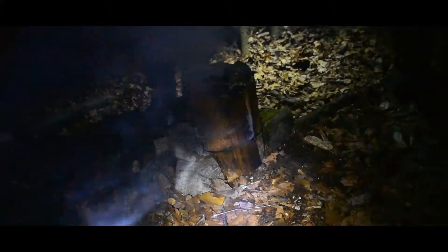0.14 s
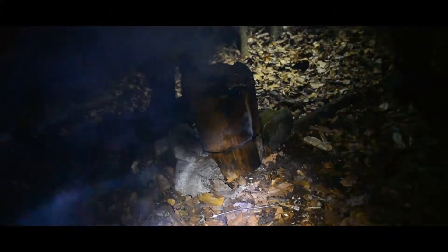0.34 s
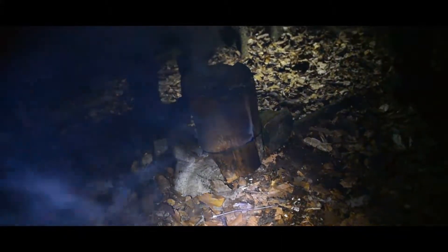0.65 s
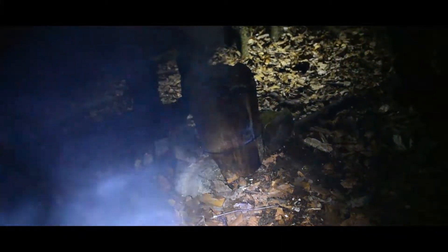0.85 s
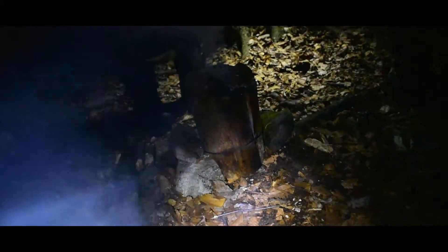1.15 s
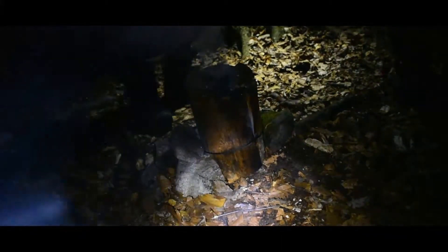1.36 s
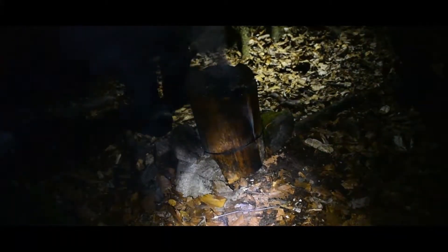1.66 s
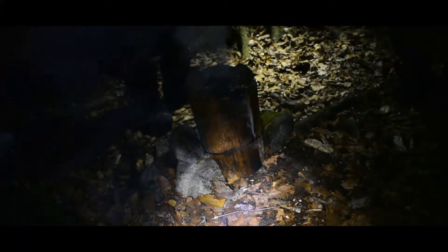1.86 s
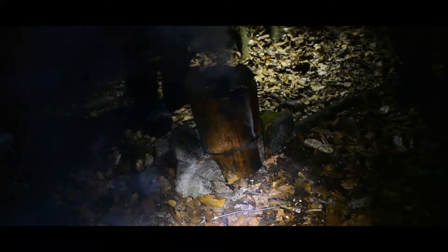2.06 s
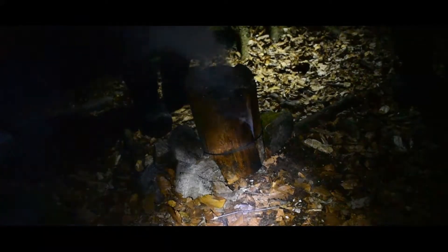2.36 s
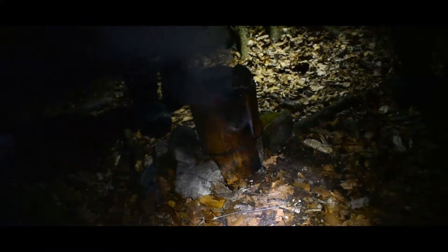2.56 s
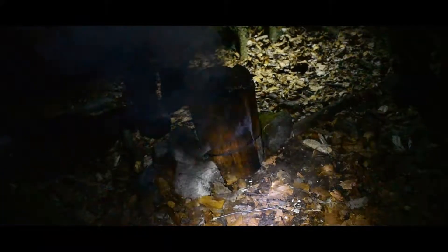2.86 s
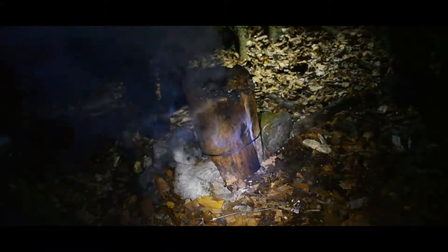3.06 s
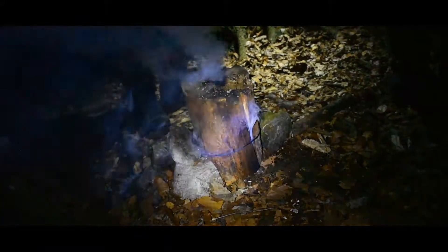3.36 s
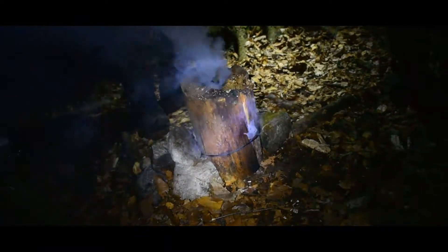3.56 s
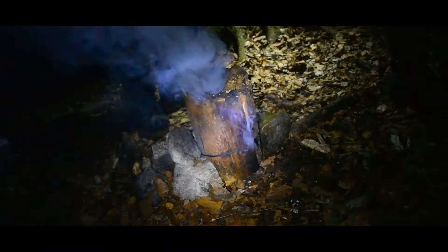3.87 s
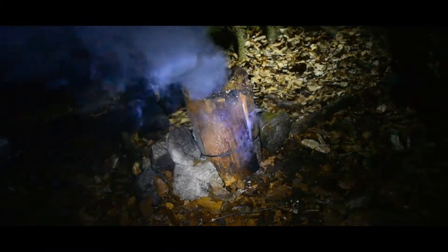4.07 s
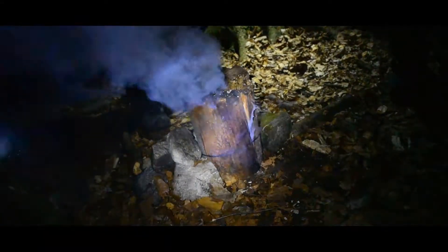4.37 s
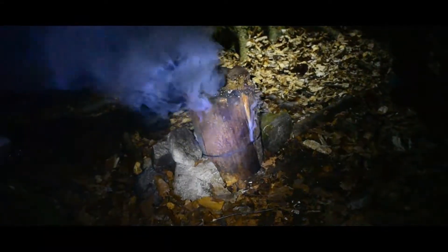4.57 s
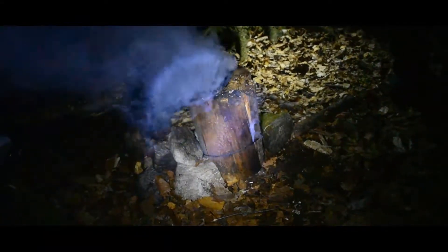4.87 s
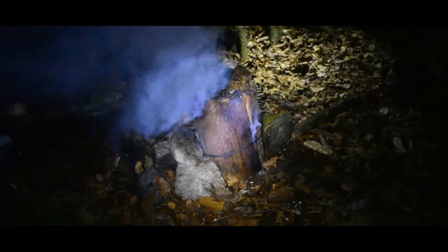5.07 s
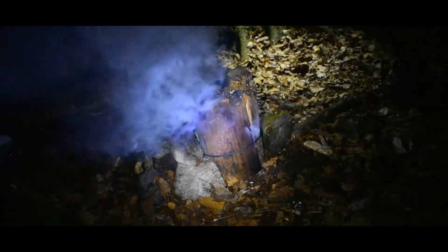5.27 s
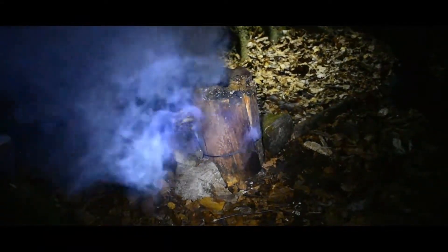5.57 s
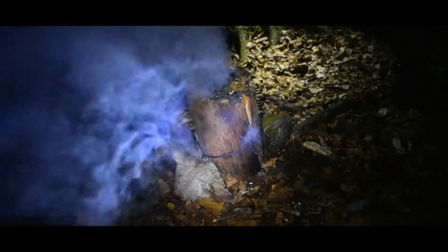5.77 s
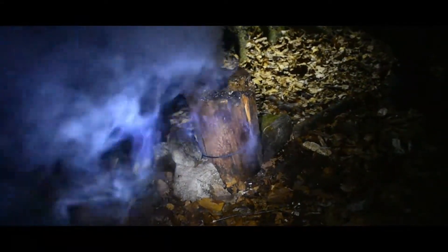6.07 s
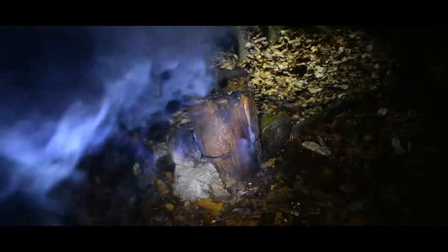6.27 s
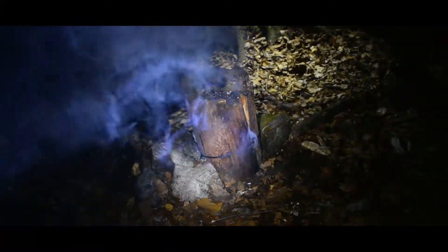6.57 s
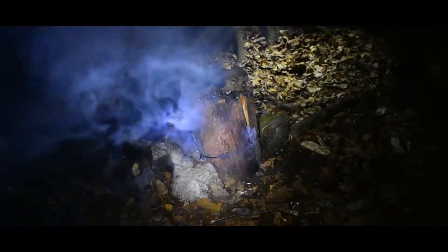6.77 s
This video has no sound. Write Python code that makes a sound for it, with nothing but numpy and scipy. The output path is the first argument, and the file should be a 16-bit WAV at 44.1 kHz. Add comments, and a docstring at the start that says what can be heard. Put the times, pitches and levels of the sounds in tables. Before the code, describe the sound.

Dry, sharp pops and clustered crackles from a wet burning log, with short steam spurts and tiny ember ticks above a hushed night hiss.

```python
"""On a forest floor at night, a damp log burns. Pockets of steam burst in the wood as pops and crackles:
short bursts of noise with a thud, a ring and treble. Some steam vents on as short spurts, one with a whistle.
Embers tick as tiny ringing clicks. A grainy rustling sizzle, made of tiny random clicks, swells and sinks.
Below lie faint bands of hiss, the low flutter of the flames and the night's hiss, all made of shaped noise."""
import sys
import numpy as np
from scipy import signal
from scipy.fft import rfft, irfft, next_fast_len
from scipy.io import wavfile

SR = 44100
rng = np.random.default_rng(int(sys.argv[2]) if len(sys.argv) > 2 else 0)


def output_pcm(signal):
    """Save a mono or channel-first signal as 16-bit PCM at the path in sys.argv[1].

    Samples are clipped to [-1, 1] before scaling.
    """
    pcm = np.clip(np.atleast_2d(signal).T, -1, 1) * 32767
    wavfile.write(sys.argv[1], SR, np.round(pcm).astype(np.int16))


N = 305337


def from_db(db):
    """Turn decibels into a gain."""
    return 10 ** (np.asarray(db) / 20)


def rms_one(x):
    """Scale a sound to an average (rms) level of 1."""
    return x / np.sqrt(np.mean(x ** 2) + 1e-20)


def at_hz(points, hz):
    """Read a curve between its points, on a log-frequency axis."""
    point_hz, values = np.array(points).T
    return np.interp(np.log(hz), np.log(point_hz), values)


def drift(corner_hz):
    """Random wandering of rms 1, smoothed by two equal low-pass poles and computed every 40 samples."""
    step, warm_up = 40, 2000
    r = np.exp(-2 * np.pi * corner_hz * step / SR)
    noise = rng.standard_normal(N // step + 2 + warm_up)
    slow = signal.lfilter([1], [1, -2 * r, r * r], noise)[warm_up:]
    return np.interp(np.arange(N) / step, np.arange(len(slow)), rms_one(slow))


def resonance(x, hz, wide_hz):
    """Two-pole resonance: passes a band around one pitch, with a gain near 1 at its top."""
    r = np.exp(-np.pi * wide_hz / SR)
    poles = [1, -2 * r * np.cos(2 * np.pi * hz / SR), r * r]
    return signal.lfilter([(1 - r * r) / 2, 0, (r * r - 1) / 2], poles, x)


def add_bands(x, rows):
    """Lift some bands of a sound, or lower them where the dB is negative."""
    return x + sum((from_db(db) - 1) * resonance(x, hz, wide_hz) for hz, wide_hz, db in rows)


# Left-right balance of the noise. Each row: pitch in Hz, left above right in dB.
LEFT_RIGHT_BALANCE = [(60, -0.5), (180, -0.5), (550, -1), (1650, -0.5), (4970, -1.5), (15000, -1.5)]


def coloured(mid, side, spectrum, likeness):
    """Shape two noises in pitch and mix them into left and right, more or less alike; rms 1."""
    size = next_fast_len(N)
    hz = np.maximum(np.fft.rfftfreq(size, 1 / SR), 1)
    alike = np.clip(at_hz(likeness, hz), 0, 1)
    m = rfft(mid, size) * np.sqrt(1 + alike)
    s = rfft(side, size) * np.sqrt(1 - alike)
    balance_db = np.outer([.5, -.5], at_hz(LEFT_RIGHT_BALANCE, hz))
    shape = from_db(balance_db + at_hz(spectrum, hz))
    return rms_one(irfft(np.array([m + s, m - s]) * shape, size)[:, :N])


def grains(per_s, spread_db, flicker_db):
    """Tiny clicks at random moments; a few are larger, and their level flickers in clumps."""
    sizes = from_db(spread_db * np.minimum(rng.exponential(1, N), 5) + flicker_db * drift(32.0))
    return rms_one(sizes * rng.standard_normal(N) * (rng.random(N) < per_s / SR))


# Steam pockets bursting. Each row: start in seconds, thud level in dB, ring pitch in Hz, ring level in dB,
# treble level in dB, fall time of the crack in ms, scatter level in dB, left above right in dB.
STEAM_POPS = [(.409, -41.5, 2050, -41, -43, 2.7, -12, -2), (.4156, -63, 2870, -32, -30, 1.5, -8, -1.5),
              (1.0421, -33.5, 4760, -20, -6, 0.81, -6, -2), (1.0647, -69, 4040, -53, -30, .35, 0, -2),
              (1.0717, -65, 4720, -39, -26.5, 0.79, -3, -2), (1.0888, -59, 4670, -48, -34, 0.64, -6, 2),
              (1.279, -66, 5480, -52, -33.5, 0.3, -9, -4), (1.3004, -70, 3410, -63, -34.5, .41, -13, -2),
              (1.39, -56, 1880, -55, -67, 3, -8, -.5), (2.022, -52, 1830, -48, -45, 1.5, -15, -2),
              (2.163, -59, 1700, -50.5, -54, 2.4, -7, -.5), (2.3448, -47.5, 1630, -50, -61, 1.4, -2, -2),
              (2.3705, -44, 3790, -38, -29, 1.65, -6, -1), (2.3802, -58, 2750, -30, -24, 1.5, -5, 0),
              (2.3884, -55, 2770, -30.5, -19, 0.31, -11, -1), (2.4043, -48, 2680, -35, -29, 0.61, -1, -1),
              (2.417, -41.5, 2740, -25.5, -37, 1.21, -6, -1),
              (2.421, -40.5, 2800, -25.5, -22.5, 2.46, 2, -2), (2.4472, -43, 1870, -36.5, -36, 1.2, -3, -2),
              (2.471, -54, 2230, -54, -49, 1.6, -4, -1), (2.5033, -68, 2680, -43, -34.5, 1.9, -6, -1),
              (2.548, -55, 1400, -49, -60, 1.4, -2, 2), (2.6517, -48, 2260, -34, -34, 1.06, 1.5, -1.5),
              (2.7518, -40, 2680, -30, -30, 0.83, -10, 0), (2.7665, -39, 3750, -20, -6, 0.61, -11, -5.5),
              (2.773, -54, 3540, -41, -21.5, 1.2, -3, 2), (2.7757, -51, 5850, -44, -28, 0.42, -2, -1),
              (2.7807, -71, 5320, -48, -25, .96, -13, -2), (2.7888, -75, 5070, -48, -28, .47, -5, -7),
              (3.106, -56, 1970, -48.5, -47, 0.55, -13, -2), (3.1302, -51, 3100, -57, -39, 0.76, -9, -1),
              (3.355, -54, 3280, -54, -37.5, .35, -13, -1), (3.5002, -49, 3320, -44, -56, 0.93, -5, 0),
              (3.52, -70, 3820, -41.5, -41, 1.5, -11, 0), (3.6184, -53, 2210, -40.5, -33.5, 1.1, -4, -1),
              (4.1346, -70, 2860, -49.5, -48, 1.8, 0, -1.5), (4.7715, -62, 4100, -47, -51, .8, -10, -3.5),
              (4.8597, -64, 4540, -40, -49, .8, -8, -1), (4.8982, -64, 3180, -41.5, -59, 0.77, -21, -2.5),
              (4.9879, -44, 4260, -20.5, -53, 1.54, -24, -7), (5.1912, -32.5, 5300, -11, -6, .28, -12, 5),
              (5.1973, -60, 3930, -29, -27, 0.79, -26, -7), (5.2363, -64, 5100, -32, -21, 0.37, -15, -0.5),
              (5.284, -53, 5700, -29, -12.5, 0.3, -9, 0), (5.2874, -52, 5440, -25.5, -17, 1.34, -22, -1),
              (5.684, -51, 2300, -42.5, -23, 0.14, -7.5, -2), (5.784, -56, 2850, -46, -60, 1.7, -14, -1),
              (5.817, -69, 3180, -36, -33, 1.1, -9, -0.5), (6.035, -72, 4830, -37.5, -52, 0.5, -11, -1),
              (6.351, -52, 2250, -43, -39, 2.1, -14, 0), (6.3653, -48.5, 2080, -41, -32, 3.17, -16, -1),
              (6.4408, -69, 4330, -43, -48, 1.2, -11, 0), (6.4664, -58, 5870, -29.5, -52, 0.18, -13, -1.5),
              (6.4883, -67, 5990, -35, -52, 0.55, -11, 3), (6.4942, -59, 4680, -35, -34, .38, -25, -3),
              (6.5454, -65, 1700, -43, -46, 1.2, -5, 1), (6.583, -68, 2930, -42.5, -43, 1.3, 0, 0),
              (6.5943, -60, 3930, -31.5, -27.5, 2.5, -19, 0),
              (6.5961, -53.5, 3770, -41, -23.5, 0.28, -14, -3),
              (6.6141, -61, 5010, -28.5, -38, 0.34, -3, 0), (6.6413, -63, 4100, -28, -24, 0.73, -8.5, -1.5),
              (6.7098, -63, 4020, -30, -64, 1.7, -8.5, -1), (6.735, -61, 3150, -47.5, -64, 1.9, -1, -2),
              (6.833, -50, 4000, -30.5, -36, 1.6, -5, 1), (6.8512, -60, 3870, -33, -41, .68, -13, -2),
              (6.8592, -51, 2960, -42, -33, 1.9, -6, -3), (6.8644, -66, 1630, -35, -32, 1.35, -9, 1),
              (6.873, -67, 4080, -31.5, -38, 0.99, -1, -1), (6.8964, -66, 4210, -43, -55, 1.3, -6, -1)]
TREBLE_HZ, TREBLE_HZ_PER_MS = 10630, -600   # slower cracks sound a little duller


def pops(onset_s=.0005, onset_db=-30, scatter_t60=0.025, side_db=-11, ring_q=1.25, treble_q=1.9, thud_hz=1200):
    """A very short faint onset, a sharp crack, then sound scattered by logs and ground; all feed three bands."""
    size, lead = SR // 10, round(onset_s * SR)
    first = slice(0, lead + SR // 400)   # levels are set over the onset and the first 2.5 ms
    t = (np.arange(size) - lead) / SR
    out = np.zeros((2, N + size))
    noise = rng.standard_normal((len(STEAM_POPS), 3, size))
    for row, (mid, side, rattle) in zip(STEAM_POPS, noise):
        s, thud_db, hz, ring_db, treble_db, crack_ms, scatter_db, pan_db = row
        treble_hz = TREBLE_HZ + TREBLE_HZ_PER_MS * crack_ms

        fall = np.exp(-1000 * t / max(crack_ms, .05))
        opening = np.clip(t / (crack_ms ** 2 / 4000) + 0.069, .1, 1)   # slow bursts open gradually
        crack = np.where(t < 0, from_db(onset_db), fall * opening)
        crack = crack / np.sqrt(np.mean((mid * crack)[first] ** 2))

        # the scatter is loudest 4 ms after the crack
        scatter = from_db(scatter_db - 60 * np.abs(t - .004) / scatter_t60) * np.clip(t / 0.0012, 0, 1)
        width = side * (from_db(side_db) * crack + 0.17 * scatter)
        burst = mid * crack + rattle * scatter + np.outer([1, -1], width)

        push = burst + np.abs(mid) * crack * (t >= 0)   # the escaping gas pushes one way
        deepest_hz = np.interp(thud_db, [-38, -33], [380, 110])   # only the biggest bursts reach the bass
        thud = signal.sosfilt(signal.butter(2, [deepest_hz, thud_hz], "band", fs=SR, output="sos"), push)
        wide_hz = hz / ring_q * hz / 3000   # deep rings are the purer ones
        ring = resonance(resonance(burst, hz, wide_hz), hz, 2 * wide_hz)
        treble = resonance(resonance(burst, treble_hz, treble_hz / treble_q), treble_hz, treble_hz)

        sound = np.zeros((2, size))
        for part, db in [(thud, thud_db), (ring, ring_db), (treble, treble_db)]:
            sound += from_db(db) * part / np.sqrt(np.mean(part[:, first] ** 2))
        at = round(s * SR) - lead
        out[:, at:at + size] += from_db([[pan_db / 2], [-pan_db / 2]]) * sound
    return out[:, :N]


# Steam venting from a crack. Each row: loudest moment in seconds, rise in ms, fall in ms, rush level in dB,
# rush pitch in Hz, hiss level in dB.
STEAM_SPURTS = [(.15, 58, 82, -59, 2520, -43.5), (0.411, 20, 25, -50, 1300, -37.5),
                (.64, 63, 58, -56, 2500, -45.5), (1.078, 16, 30, -58, 3000, -40),
                (2.379, 16, 85, -34.5, 2700, -37), (2.423, 25, 16, -38, 2600, -39),
                (2.447, 20, 23, -39, 1900, -33), (2.472, 5.4, 17, -39.5, 2200, -52),
                (2.59, 16, 28, -48, 2100, -58), (2.643, 17, 18, -39, 1280, -40.5),
                (2.772, 5.6, 105, -58, 3000, -34), (4.99, 4.1, 84, -34.5, 3000, -60),
                (5.705, 8, 50, -45, 500, -65), (6.364, 21.4, 27.4, -39, 1770, -28),
                (6.598, 25, 50, -47, 3500, -41), (6.866, 19, 26, -43, 1570, -45)]
# Colour of the bright hiss, also used in the sizzle. Each row: pitch in Hz, relative level in dB per Hz.
HISS_COLOUR = [(3000, -19.5), (5000, -5), (7000, -4), (9500, -0.5), (11500, -3), (13500, -12.5),
               (15500, -7)]


def spurts(swell_db=22, rush_q=1.0, alike=0.94):
    """Sputtering steam swells and dies; its rush sits on the pitch of its crack."""
    mid, side = (grains(per_s=20000, spread_db=2.5, flicker_db=0.5) for _ in range(2))
    likeness = [(100, alike), (10000, alike)]
    flat = coloured(mid, side, [(100, 0), (10000, 0)], likeness)
    hiss = coloured(mid, side, HISS_COLOUR, likeness)
    out = np.zeros((2, N))
    for s, rise_ms, fall_ms, rush_db, hz, hiss_db in STEAM_SPURTS:
        start, end = s - rise_ms / 1000, s + fall_ms / 1000
        a, b = round(start * SR), min(round(end * SR), N)
        swell = from_db(np.interp(np.arange(a, b) / SR, [start, s, end], [-swell_db, 0, -swell_db]))
        rush = rms_one(resonance(resonance(flat[:, a:b], hz, hz / rush_q), hz, 2 * hz / rush_q))
        out[:, a:b] += swell * (from_db(rush_db) * rush + from_db(hiss_db) * hiss[:, a:b])
    return out


# The log rings. Each row: pitch in Hz, width in Hz, lift in dB.
LOG_RINGS = [(577, 62, 3.5), (1025, 115, 6.5), (1220, 210, 9), (1653, 146, 6.5), (2050, 78, 4.5),
             (2750, 73, 3.5), (3150, 82, 0)]


def wood(x, air_hz=12500):
    """Bursts and spurts shake the log, which rings on briefly; the highest treble is lost on the way."""
    return signal.lfilter(*signal.butter(1, air_hz, fs=SR), add_bands(x, LOG_RINGS))


# One spurt whistles through a narrow crack. Each row: time in seconds, pitch in Hz, level in dB.
WHISTLE_PATH = [(4.99, 5710, -28), (5.004, 5770, -36.5), (5.056, 5350, -41), (5.075, 5570, -71)]


def whistle(wide_hz=650, sputter_db=4.5, overtone=1.43, overtone_db=-9, pan_db=-5):
    """Two bands of noise follow the crack's gliding pitch, and their level sputters fast."""
    path_s, path_hz, path_db = np.transpose(WHISTLE_PATH)
    t = np.arange(N) / SR
    phase = 2 * np.pi * np.cumsum(np.interp(t, path_s, path_hz)) / SR
    level_db = np.interp(t, path_s, path_db, -120, -120)   # as good as silent outside the path
    band = signal.lfilter(*signal.butter(2, wide_hz / 2, fs=SR), rng.standard_normal((4, N)))
    tone = band[0] * np.cos(phase) + band[1] * np.sin(phase)
    upper = band[2] * np.cos(overtone * phase) + band[3] * np.sin(overtone * phase)
    tone += from_db(overtone_db) * upper
    return rms_one(tone) * from_db(level_db + sputter_db * drift(120) + np.array([[pan_db / 2], [-pan_db / 2]]))


def ticks(per_s=25, softest_db=-44, spread_db=7.5):
    """Small embers tick at random, each click ringing a few cycles at one of eight pitches."""
    sizes = from_db(softest_db + spread_db * np.minimum(rng.exponential(1, N), 3))
    clicks = (rng.random(N) < per_s / SR) * sizes
    pitches, dealt = np.geomspace(1200, 11000, 8), rng.integers(0, 8, N)
    # the tiny constant keeps the filters away from extremely small numbers
    return sum(resonance(clicks * (dealt == k) + 1e-18, hz, hz / 3) for k, hz in enumerate(pitches))


# Surges of the grainy sizzle. Each row: start in seconds, end in seconds,
# rush level in dB at first and at last, hiss level in dB at first and at last.
SIZZLE_SURGES = [(0, 0.735, -55.5, -59.5, -57.5, -59), (0.787, 1.06, -53.5, -53, -55.5, -51),
                 (1.1, 1.283, -50, -54.5, -46.5, -47.5), (1.303, 1.409, -56, -55, -57, -62),
                 (2.01, 2.513, -64.5, -55.5, -57, -55), (2.554, 2.653, -50.5, -49, -60, -50),
                 (2.71, 2.857, -60, -59, -56, -53), (2.885, 3.06, -65, -68, -55, -58),
                 (3.098, 3.647, -57, -53, -56, -58.5), (3.922, 4.265, -65, -57.5, -62, -57.5),
                 (4.349, 4.613, -51.5, -52, -44.5, -46), (4.665, 4.954, -52, -58, -49, -52),
                 (4.98, 5.187, -60, -53.5, -48.5, -43), (5.242, 5.329, -60, -52.5, -39.5, -42.5),
                 (5.38, 5.497, -59.5, -57.5, -51.5, -48.5), (5.52, 5.667, -52.5, -55, -48.5, -46),
                 (5.7, 5.85, -56, -57, -65, -63), (6.426, 6.7, -61, -61, -58, -54),
                 (6.83, 6.92, -59, -56, -62, -59)]
FADE_IN_S, FADE_OUT_S = .04, 0.05   # a surge comes in and dies away over these times
WAVER_DB = 1.27   # rush and hiss each waver a few times a second
QUIET_RUSH_DB, QUIET_HISS_DB = -62.5, -65   # the sizzle between surges, before the waver


def sizzle_levels():
    """Levels of rush and hiss in dB: a quiet floor, with each surge added as power, and a waver on top."""
    t = np.arange(N) / SR
    power = np.outer(from_db([QUIET_RUSH_DB, QUIET_HISS_DB]) ** 2, np.ones(N))
    for start, end, rush_first, rush_last, hiss_first, hiss_last in SIZZLE_SURGES:
        gate = np.interp(t, [start - FADE_IN_S, start, end, end + FADE_OUT_S], [0, 1, 1, 0])
        rush_db = np.interp(t, [start, end], [rush_first, rush_last])
        hiss_db = np.interp(t, [start, end], [hiss_first, hiss_last])
        power = power + (gate * from_db([rush_db, hiss_db])) ** 2
    return 10 * np.log10(power) + WAVER_DB * np.array([drift(6.7), drift(9.4)])


# Colour of the duller rush. Each row: pitch in Hz, relative level in dB per Hz.
RUSH_COLOUR = [(250, -26), (500, 1.5), (1150, 1), (1450, -0.5), (1900, 2.5), (2800, 0), (4000, -2),
               (6000, -13.5)]
# Stronger and weaker bands in the sizzle's rush. Each row: pitch in Hz, width in Hz,
# lift in dB (negative is weaker).
SIZZLE_BANDS = [(1225, 125, 5.5), (1700, 290, 3), (2750, 390, 2), (5100, 550, -10)]


def sizzle(per_s=15000, spread_db=0.5, flicker_db=1.17, alike=0.95):
    """A grainy rustling sizzle: one stream of grains sounds in both a duller rush and a bright hiss."""
    rush_db, hiss_db = sizzle_levels()
    mid, side = grains(per_s, spread_db, flicker_db), grains(per_s, spread_db, flicker_db)
    likeness = [(100, alike), (10000, alike)]
    rush = add_bands(coloured(mid, side, RUSH_COLOUR, likeness), SIZZLE_BANDS)
    hiss = coloured(mid, side, HISS_COLOUR, likeness)
    return from_db(rush_db) * rms_one(rush) + from_db(hiss_db) * hiss


# Faint steady hiss from narrow cracks. Each row: start in seconds, end in seconds, pitch in Hz,
# width of each filter in Hz, level in dB.
CRACK_BANDS = [(.42, .98, 1150, 90, -61), (3.22, 3.5, 5000, 600, -63), (4.81, 4.963, 2750, 450, -54.5),
               (5.503, 5.553, 1110, 120, -57.5), (6.06, 6.268, 1220, 120, -69)]


def bands():
    """Hiss from narrow cracks: noise passes twice through a narrow resonance, fading in and out."""
    out, noise = np.zeros(N), rng.standard_normal(N)
    for start, end, hz, wide_hz, db in CRACK_BANDS:
        a, b = round(start * SR), round(end * SR)
        band = rms_one(resonance(resonance(noise[a:b], hz, wide_hz), hz, wide_hz))
        out[a:b] += from_db(db) * band * signal.windows.tukey(b - a, .5)
    return out


# Colour of the flames. Each row: pitch in Hz, relative level in dB per Hz.
FLAME_COLOUR = [(13, -34), (22, -4.5), (119, 6), (400, -6.5), (520, -40), (880, -120)]
# How alike left and right are in flames and night air. Each row: pitch in Hz, likeness from 0 to 1.
AIR_LIKENESS = [(60, 0.98), (180, 0.97), (550, 0.62), (1650, 0.69), (5000, 0.085), (15000, 0.11)]
FLAMES_DB, FLARE_S, FLARE_DB = -62, (4.6, 5.4), 2   # level at first; it grows by 2 dB over this span in seconds


def flames():
    """The flames flutter as low noise whose level wanders."""
    flare_db = np.interp(np.arange(N) / SR, FLARE_S, [0, FLARE_DB])
    level_db = FLAMES_DB + flare_db + 2.0 * drift(4.9)
    return from_db(level_db) * coloured(*rng.standard_normal((2, N)), FLAME_COLOUR, AIR_LIKENESS)


# Colour of the night air. Each row: pitch in Hz, relative level in dB per Hz.
NIGHT_COLOUR = [(150, -17), (250, -6), (466, -7.5), (810, -10.5), (1250, -8), (2330, -15), (4650, -13.5),
                (4980, -11), (6800, -14.5), (9450, -9), (15600, -19.5)]
NIGHT_DB = -55.5


def night():
    """The night's hiss is steady noise, more alike left and right in the bass."""
    return from_db(NIGHT_DB) * coloured(*rng.standard_normal((2, N)), NIGHT_COLOUR, AIR_LIKENESS)


def low_pass(x, order, drop_db, stop_hz):
    """Cut steeply: from stop_hz upwards, everything is down by at least drop_db."""
    return signal.sosfilt(signal.cheby2(order, drop_db, stop_hz, fs=SR, output="sos"), x)


def scene():
    """Pops, spurts, ticks and whistle over the low-passed steady sounds."""
    steady = night() + flames() + sizzle() + bands()
    steady = low_pass(steady, order=14, drop_db=55, stop_hz=15950)
    return steady + wood(pops() + spurts()) + ticks() + whistle()


def record(dry):
    """Clip peaks at full scale and cut the top of the treble."""
    cut = low_pass(np.clip(dry, -1, 1), order=12, drop_db=70, stop_hz=16900)
    return np.clip(cut, -1, 1)


dry = scene()
out = record(dry)
output_pcm(out)
```